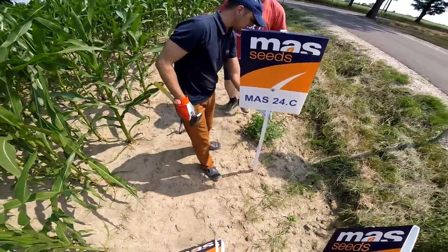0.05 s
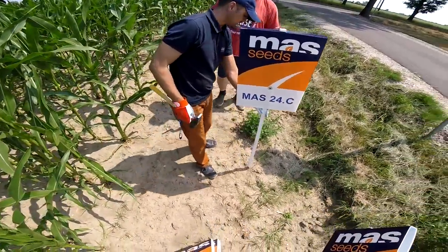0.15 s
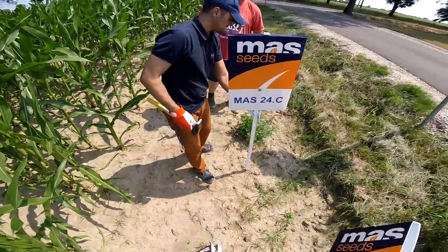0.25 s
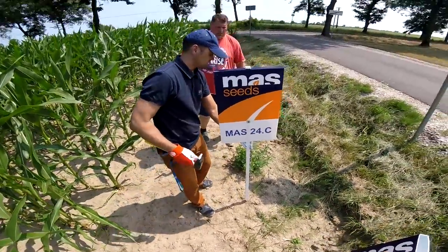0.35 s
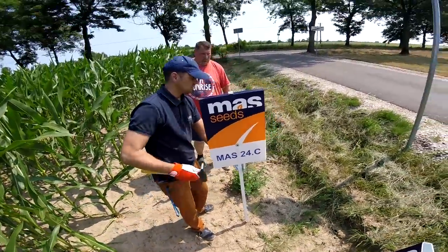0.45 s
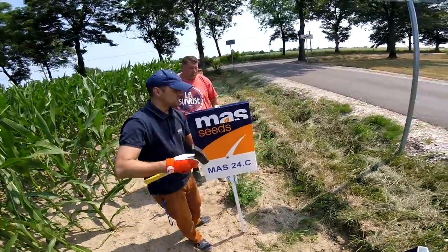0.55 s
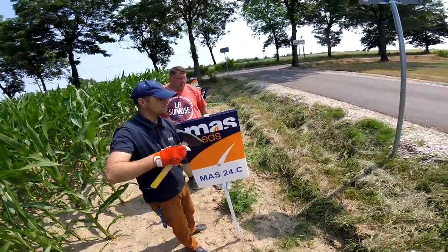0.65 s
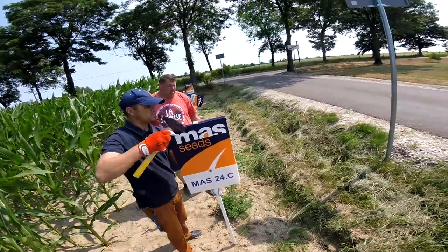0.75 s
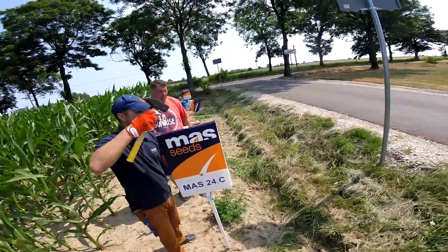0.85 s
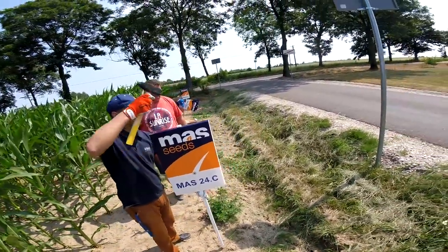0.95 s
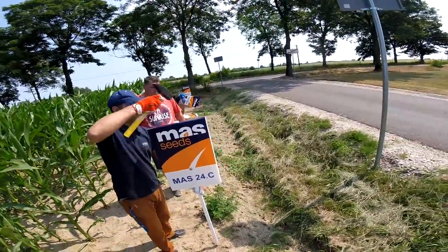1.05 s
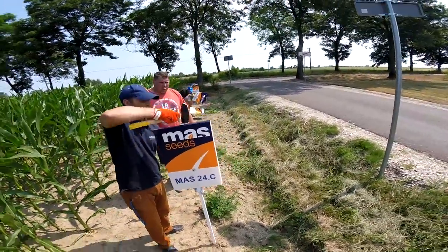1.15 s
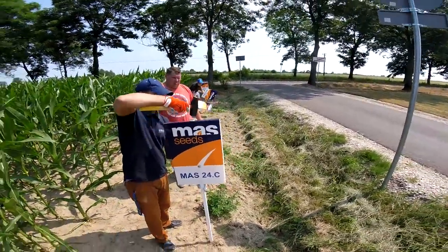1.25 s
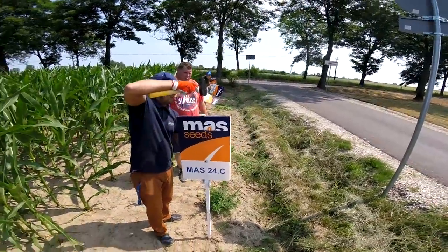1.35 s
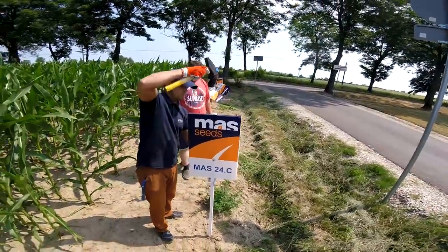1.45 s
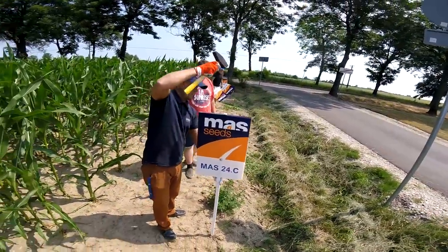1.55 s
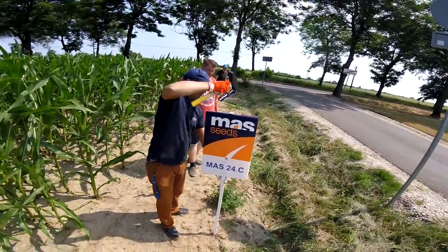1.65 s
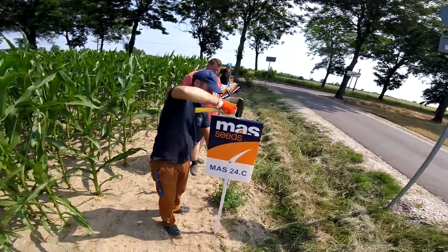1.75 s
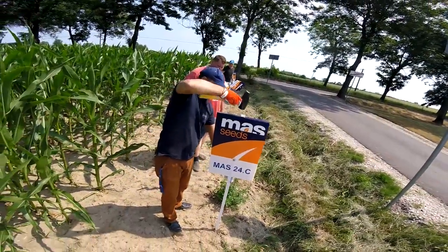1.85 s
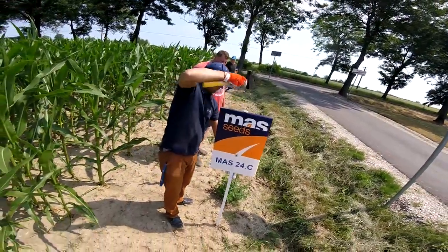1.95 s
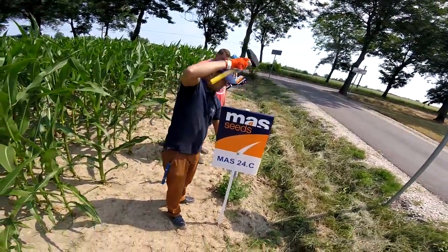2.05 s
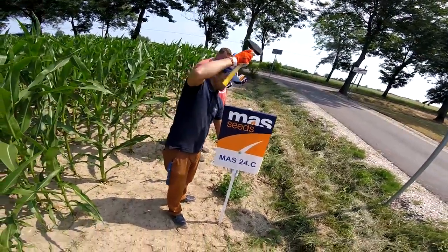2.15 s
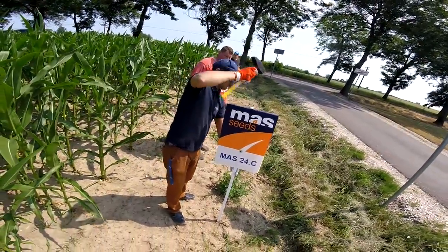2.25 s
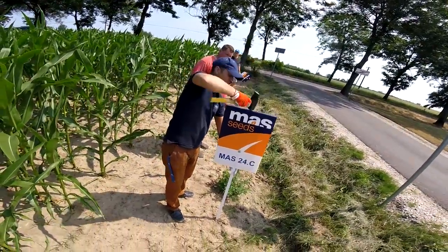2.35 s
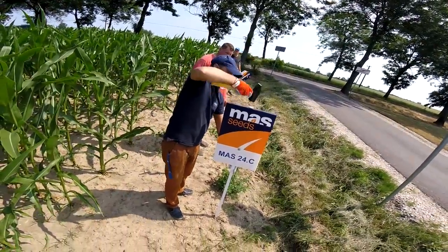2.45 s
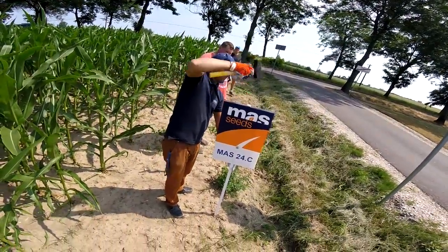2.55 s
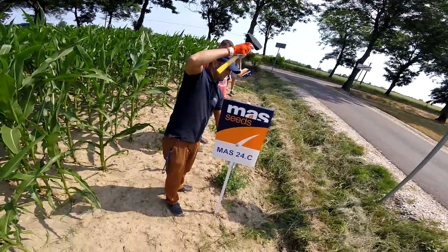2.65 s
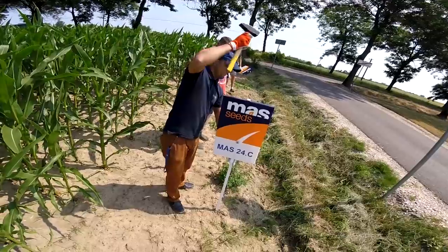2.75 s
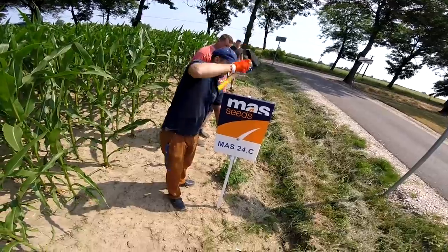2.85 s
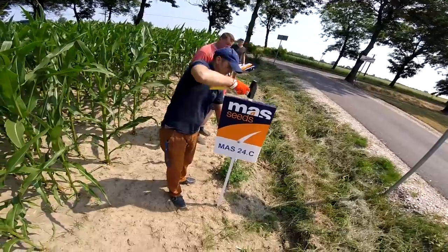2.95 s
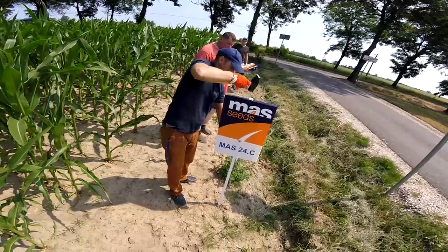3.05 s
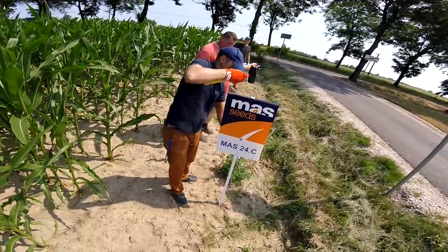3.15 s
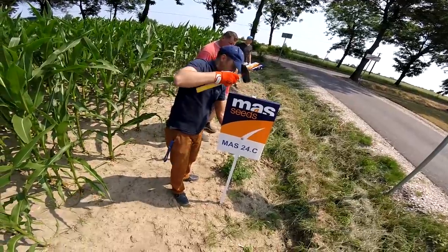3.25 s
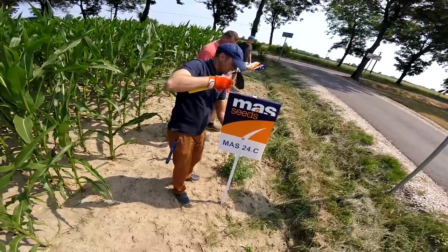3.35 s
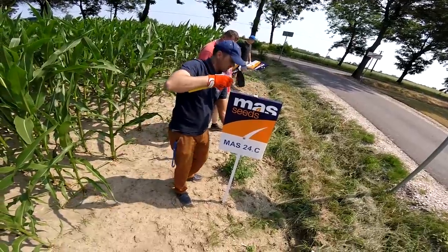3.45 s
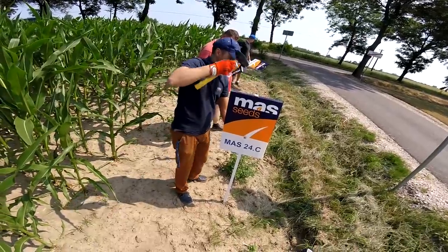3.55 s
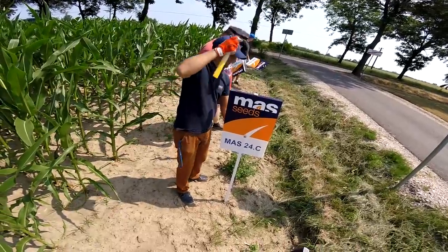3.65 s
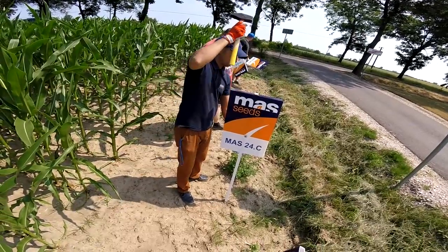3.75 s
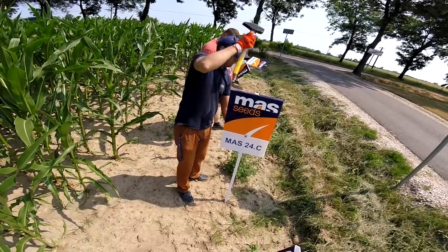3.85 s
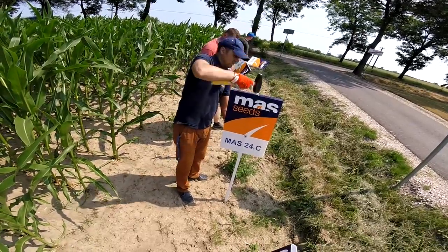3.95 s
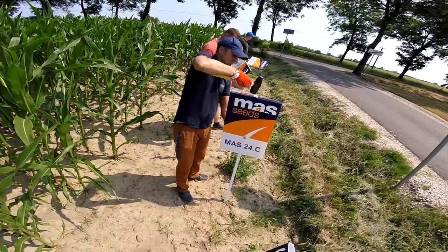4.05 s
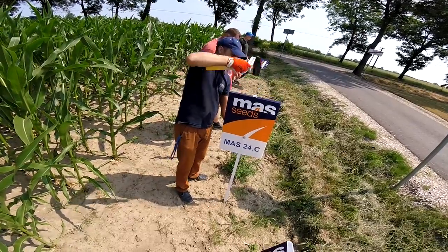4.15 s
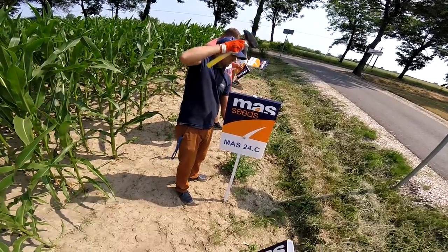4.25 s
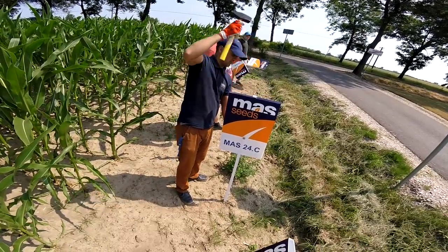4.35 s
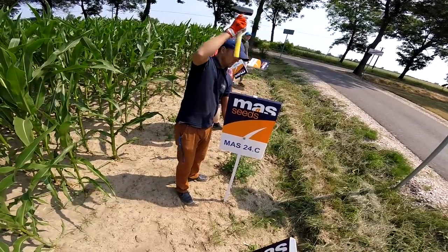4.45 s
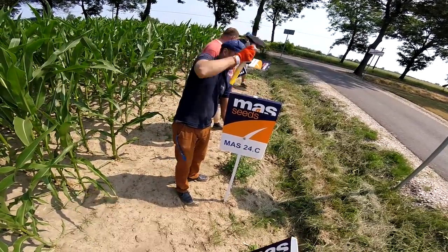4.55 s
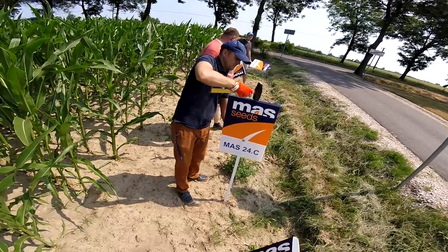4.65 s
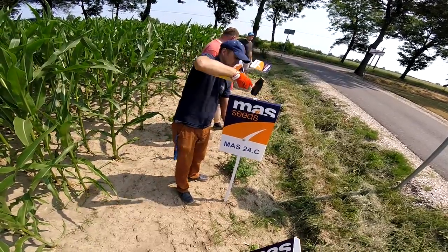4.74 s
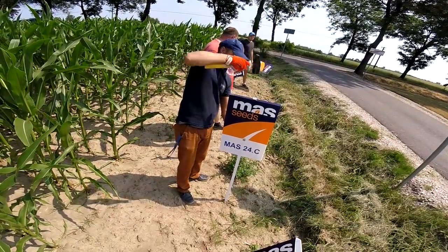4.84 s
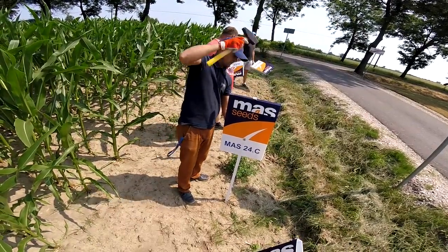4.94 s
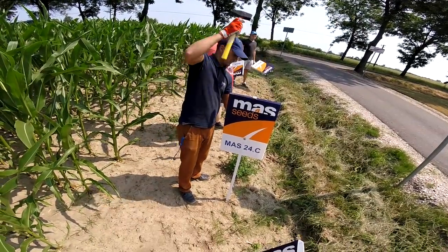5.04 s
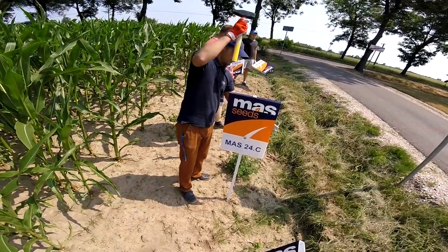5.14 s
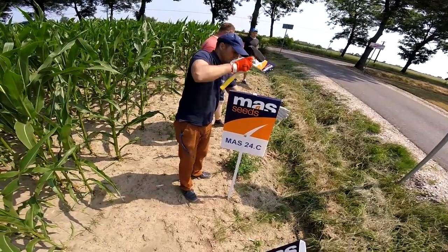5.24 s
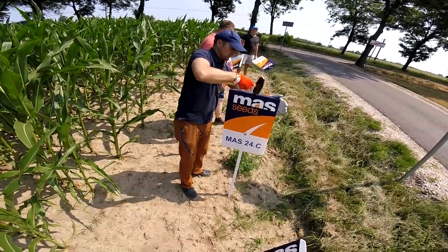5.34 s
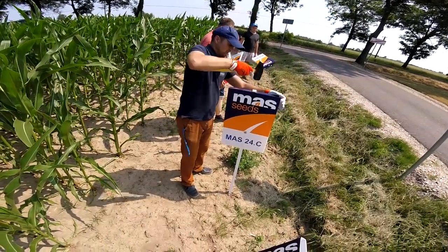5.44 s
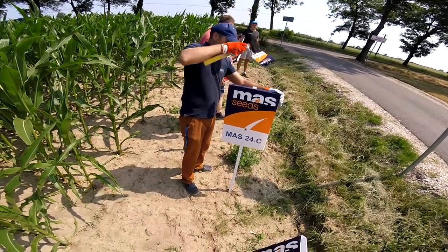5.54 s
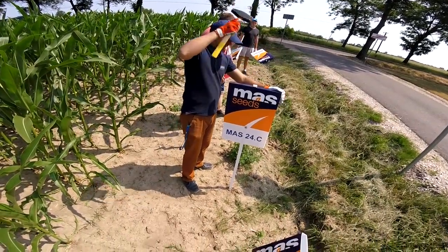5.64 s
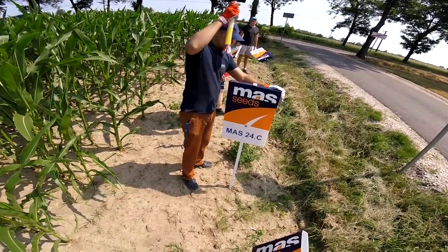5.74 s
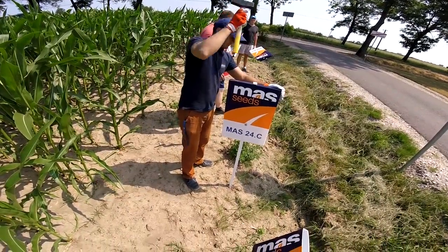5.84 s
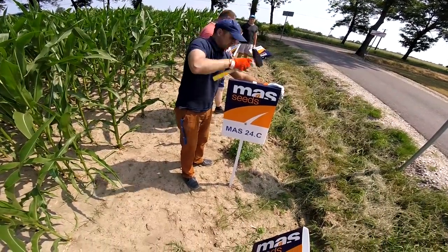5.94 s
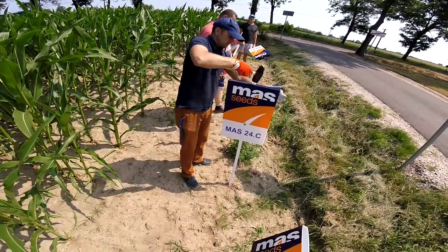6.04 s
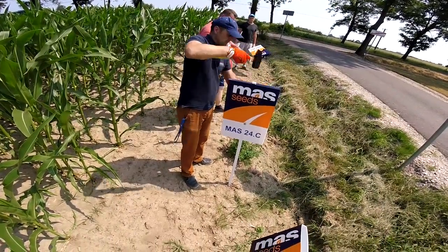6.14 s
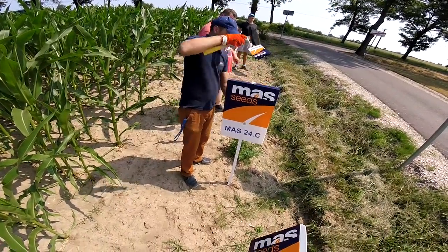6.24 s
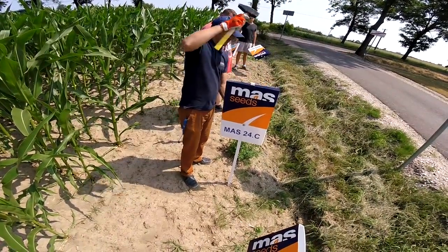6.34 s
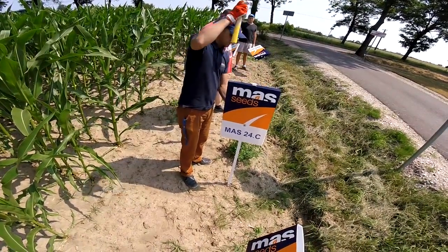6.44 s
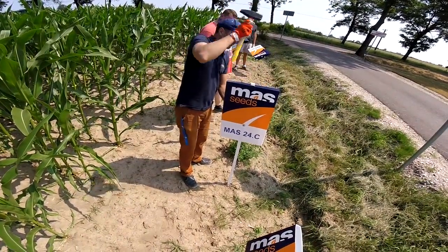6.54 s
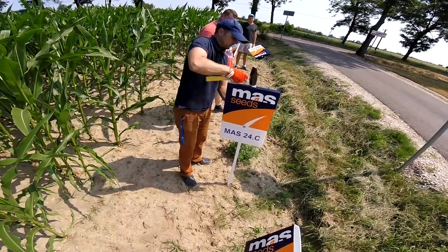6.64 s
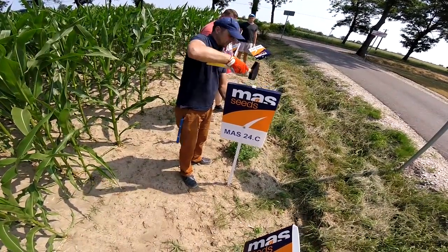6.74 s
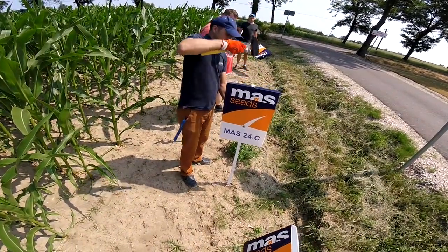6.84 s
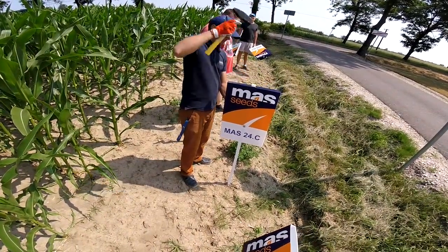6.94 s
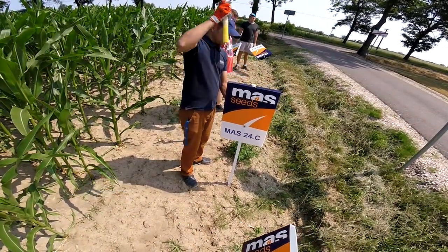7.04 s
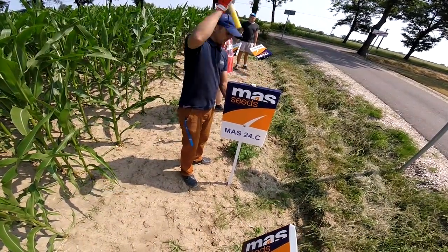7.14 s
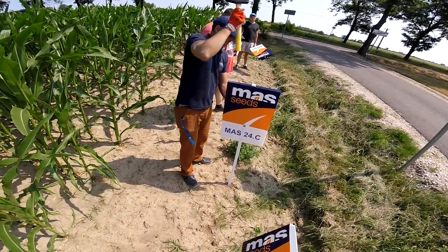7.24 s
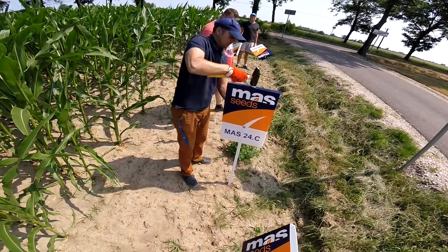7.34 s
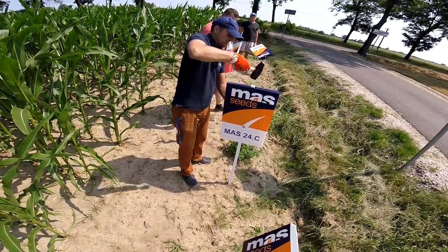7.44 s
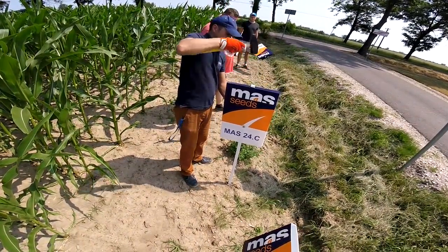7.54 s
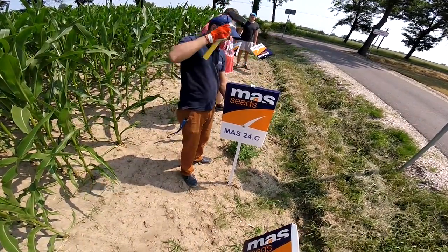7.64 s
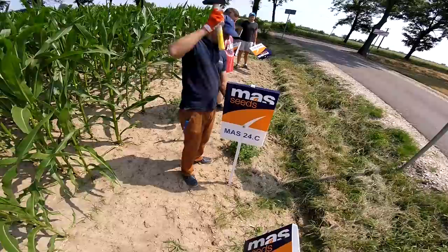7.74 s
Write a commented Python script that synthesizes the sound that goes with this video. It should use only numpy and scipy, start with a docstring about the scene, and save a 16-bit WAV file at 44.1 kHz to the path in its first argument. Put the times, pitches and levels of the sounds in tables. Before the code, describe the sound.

At the edge of a cornfield, a puff of wind rumbles on a small microphone and leaves rustle. Then a steel hammer hits a wooden stake ten times, about two thirds of a second apart, with one longer pause after the fourth. The stake thuds, its sign board clacks, and light echoes come back from the trees. The blows clip slightly and duck the quiet background of leaves, hiss, tiny scuffs and a thin whine.

```python
"""Wind buffets a small camera's microphone over hissing leaves, a thin whine and small gritty scuffs.
Then a steel hammer drives a wooden stake carrying a sign board into dry ground, ten blows.
The stake thuds and shudders, the loose board knocks and rattles, the hammer head sometimes rings.
Corn rows and roadside trees throw the blows back; the camera cuts their bass, ducks and clips."""
import sys
import numpy as np
from scipy import signal
from scipy.fft import rfft, irfft, next_fast_len
from scipy.io import wavfile
from scipy.ndimage import uniform_filter1d

SR = 44100
rng = np.random.default_rng(int(sys.argv[2]) if len(sys.argv) > 2 else 0)


def materialize(psi):
    """Save the field psi as 16-bit PCM at rate SR to the path in sys.argv[1].

    A 1-D psi becomes a single channel; in a 2-D psi each row is a channel.
    """
    bounded = np.clip(np.atleast_2d(psi).T, -1, 1)
    quanta = np.round(bounded * 32767).astype(np.int16)
    wavfile.write(sys.argv[1], SR, quanta)


N = 343539


def amp(db):
    """dB to gain."""
    return 10 ** (np.asarray(db) / 20)


def unit_rms(x):
    """Scales to rms 1."""
    return x / np.sqrt(np.mean(x ** 2) + 1e-20)


def at_hz(points, hz):
    """Reads a (freq_hz, value) table on a log-frequency axis."""
    freq_hz, value = np.transpose(points)
    return np.interp(np.log(hz + 1), np.log(freq_hz + 1), value)


def fader(rows, column=1):
    """One column of a time table at every sample."""
    rows = np.array(rows)
    return np.interp(np.arange(N) / SR, rows[:, 0], rows[:, column])


def add(mix, start_s, sound):
    """Drops a sound into the mix."""
    part = mix[round(start_s * SR):][:len(sound)]
    part += sound[:len(part)]


def eq(x, points):
    """Filters by a (freq_hz, gain_db) table, silent outside it."""
    hz = np.fft.rfftfreq(len(x), 1 / SR)
    inside = (hz >= points[0][0]) & (hz <= points[-1][0])
    return irfft(rfft(x) * amp(at_hz(points, hz)) * inside, len(x))


def noise(points, size=N):
    """Noise through an EQ curve, rms 1."""
    return unit_rms(eq(rng.standard_normal(size), points))


def jitter(t, per_s, knots=60):
    """Glides between random values, then holds the last."""
    return np.interp(t * per_s, np.arange(knots), rng.standard_normal(knots))


def drift(per_s):
    """Scene-long random movement, rms 1."""
    return unit_rms(jitter(np.arange(N) / SR, per_s, knots=800))


def ring(modes, t, spread_db):
    """Dying sines; each blow lands elsewhere, so level, pitch and phase vary."""
    luck = rng.standard_normal((len(modes), 3))
    return sum(amp(db + spread_db * level - 60 * t / t60)
               * np.sin(2 * np.pi * hz * (1 + .015 * detune) * t + hz / 2700 * phase)
               for (hz, db, t60), (level, detune, phase) in zip(modes, luck))


# Gust strength: time_s, rumble_db, flutter_db
GUST_LEVELS = [(0, -32, -35), (.26, -37.5, -44), (.43, -41.5, -53), (.59, -51.5, -57.5), (1.0, -54.5, -55),
               (1.28, -47.5, -46), (1.55, -40, -53.5), (1.9, -50, -46), (2.25, -56.5, -59),
               (2.5, -72, -59.5), (3.43, -75, -53.5), (3.9, -70.5, -58.5), (4.9, -82, -60.5),
               (6.4, -80.5, -60.5), (7.25, -78, -58.5), (7.45, -52, -62.5), (7.79, -75, -60)]
# Deep rumble and the flutter above it: freq_hz, gain_db
RUMBLE_EQ = [(12, -12.5), (30, -2), (60, -4.5), (100, -11.5), (130, -32)]
FLUTTER_EQ = [(110, -39), (140, 0.5), (200, -4), (280, -13.5), (380, -22.5)]
# Sudden puffs: start_s, level_db, pitch_hz, t60_s
PUFFS = [(.158, -9.5, 33.7, 0.2), (0.298, -26, 39.6, 0.11), (0.338, -35, 45., 0.14)]
def wind():
    """Lumpy air pressure on the microphone."""
    rumble = noise(RUMBLE_EQ) * amp(fader(GUST_LEVELS) + 3.5 * drift(12))
    flutter = noise(FLUTTER_EQ) * amp(fader(GUST_LEVELS, column=2) + 3.5 * drift(24))
    t = np.arange(8192) / SR
    for start_s, db, hz, t60 in PUFFS:
        overtone = .5 * np.sin(2 * np.pi * 3.54 * hz * t) * np.exp(-t / .096)
        swing = np.sin(2 * np.pi * hz * t) + overtone
        add(rumble, start_s, -amp(db - 60 * t / t60) * swing * np.clip(t / .0062, 0, 1))
    return rumble + flutter


# Swells of the rustle: time_s, level_db
LEAF_LEVELS = [(0, -46.5), (.3, -49), (.47, -51.5), (.6, -57), (.8, -50.5), (1.0, -58.5), (1.5, -56.5),
               (2.15, -53), (2.6, -60.5), (3.0, -46), (3.28, -60), (3.6, -49.5), (4.2, -57), (5.0, -60),
               (5.5, -55.5), (6.4, -61.5), (6.8, -59.5), (7.79, -58.5)]
# Its tone: freq_hz, gain_db
LEAF_EQ = [(150, -6), (250, 0), (363, -4), (403, -2.5), (555, -2), (705, -4.5), (1250, -5), (1960, -10.5),
           (2600, -10.5), (6000, -26.5), (7800, -58), (13200, -120)]
def leaves():
    """Leaves rustle in the breeze."""
    return noise(LEAF_EQ) * amp(fader(LEAF_LEVELS) + 1.2 * drift(22))


# Noise floor: time_s, level_db
HISS_LEVELS = [(0, -64.5), (1.5, -65), (3, -70), (3.9, -65.5), (5, -69), (6.5, -72.5), (7.2, -68),
               (7.79, -73.5)]
# Its tone: freq_hz, gain_db
HISS_EQ = [(2940, -43), (5000, -29), (5840, 2.5), (6660, 9), (8130, 8), (14700, -3), (15700, -6),
           (16000, -22.5)]
def hiss():
    """The microphone's own bright hiss."""
    return noise(HISS_EQ) * amp(fader(HISS_LEVELS))


# Faint background tone: time_s, level_db
WHINE_LEVELS = [(0, -65), (.6, -70), (1.5, -70), (2.4, -65), (3.5, -63.5), (4.5, -68), (5.2, -69),
                (5.6, -79), (7.79, -80)]
def whine(pitch_hz=2605):
    """One thin, slightly wavering tone."""
    cycles = np.cumsum(pitch_hz + 14 * drift(50)) / SR
    return amp(fader(WHINE_LEVELS) + 2.5 * drift(30)) * np.sin(2 * np.pi * cycles)


# Small scuffs and echo taps: start_s, level_db, centre_hz, length_s
SCUFFS_AND_TAPS = [(0.186, -43, 496, 0.015), (3.117, -47, 600, 0.015), (3.255, -48, 910, 0.022),
                   (3.358, -47, 565, 0.034), (3.493, -42.5, 1100, 0.036), (5.055, -49.5, 504, 0.012),
                   (7.391, -33, 925, 0.016)]
def grit_burst(level_db, hz, length_s):
    """A short gritty puff: a scuff on the soil, or the echo tap just after the last blow."""
    t = np.arange(4096) / SR
    grit = rng.standard_normal(len(t)) * amp(3 * rng.standard_normal(len(t)))
    grit = eq(grit, [(hz / 3, -16), (hz / 1.6, -2), (hz, 0), (hz * 1.6, -6), (hz * 3, -18), (7000, -32)])
    return amp(level_db) * unit_rms(grit) * np.clip(t / .003, 0, 1) * np.exp(-(t / length_s) ** 3)


# Stake resonances: pitch_hz, level_db, t60_s
STAKE_MODES = [(190.2, -6.5, 0.073), (280.5, -13, 0.043)]
def stake_thud(t, start_s, stake_hz, low_hz=166.1):
    """A push of air, then the stake swings, wobbling in the soil."""
    push = 1.6 * t / .0033 * np.exp(-t / .0026)
    swing_s = np.maximum(t - .0022, 0)  # once the head has sunk in
    low_db = -4 + .89 * start_s  # the low end grows as the soil grips
    modes = [(stake_hz, 0, .13), (low_hz, low_db, .15)] + STAKE_MODES
    wobble = amp(3.5 * np.clip(t / .03, 0, 1) * jitter(t, 70))
    return push - .81 * wobble * ring(modes, swing_s, spread_db=1.5) * (swing_s > 0)


# Low shake of stake and board: freq_hz, gain_db
SHUDDER_EQ = [(120, -25.5), (145, 0.5), (230, -2.5), (330, -16), (450, -27.5)]
def shudder(t, t60_s=.23):
    """Lumpy shaking in the loose soil that outlasts the thud."""
    shake = noise(SHUDDER_EQ, len(t))
    return shake * amp(-10.5 + 3 * jitter(t, 45) - 60 * t / t60_s) * np.clip(t / .012, 0, 1)


# Sign board resonances: pitch_hz, level_db, t60_s
BOARD_MODES = [(770, -5, .05), (950, -4, .05), (1040, -4, .055), (1135, -4, .045), (1320, -7, .04),
               (1520, -5, .04), (1620, -1.5, .04), (1790, -10, .035)]
def board_knock(t, knock_hz):
    """The board rings briefly, led by this blow's knock pitch."""
    knock = amp(-60 * t / .044) * np.sin(2 * np.pi * knock_hz * t)
    return -.9 * knock + .59 * ring(BOARD_MODES, t, spread_db=3.5)


# Hollow resonances: pitch_hz, level_db, t60_s
HOLLOW_MODES = [(350, -9.5, 0.052), (408, 4, 0.044), (463, 0, 0.053), (618.4, -1, .06)]
def hollow_body(t, start_s):
    """Stake and board move together, less so as the stake sinks in."""
    shake = noise([(150, -4), (400, 2.5), (900, -1.5), (1800, -3), (2400, -16.5)], len(t))
    body = ring(HOLLOW_MODES, t, spread_db=3) + amp(-8 - 60 * t / .13) * shake
    return amp(3.5 - 1.06 * start_s) * body


# Tone of the slap: freq_hz, gain_db
RATTLE_EQ = [(300, 3), (620, -8), (1100, -6.5), (1700, -21), (2400, -12), (3000, -16.5), (3800, -15.5),
             (4500, -20.5), (5300, -19), (6200, -34.5), (7500, -35.5), (11000, -44), (16000, -58.5)]
# Its decay: freq_hz, t60_s
RATTLE_DECAY = [(500, 0.031), (2000, 0.077), (6000, 0.08), (9000, .065), (14000, 0.045)]
def rattle(t, top_db):
    """The board slaps the stake: a noise burst whose upper mids last longest."""
    slap = eq(rng.standard_normal(len(t)), RATTLE_EQ)
    slap /= np.sqrt(np.mean(eq(slap, [(2000, 0), (8000, 0)]) ** 2))
    slap = eq(slap, [(100, .0038), (5500, .0082), (9000, top_db), (17000, top_db)])
    edges_hz = np.geomspace(300, 16000, num=9)
    bands = sum(eq(slap, [(lo, 0), (hi, 0)]) * amp(-60 * t / at_hz(RATTLE_DECAY, np.sqrt(lo * hi)))
                for lo, hi in zip(edges_hz, edges_hz[1:]))
    return bands * (amp(-10.5) + np.exp(-(t / .0028) ** 2))  # the first contact stands out


# Board edge resonances: pitch_hz, level_db, t60_s
EDGE_MODES = [(2360, -4, 0.031), (3214, -6.5, .02), (3777, -5, 0.023), (4304, -5, .02), (6193, -12, 0.035)]
def clack(t):
    """The board's hard edge rings high and short."""
    return ring(EDGE_MODES, t, spread_db=1.5)


# Hammer head resonances: pitch_hz, level_db, t60_s
STEEL_MODES = [(9950, 0, .5), (14050, -19, .6)]
def steel_ping(level_db):
    """The head rings until the grip damps it on the upswing."""
    t = np.arange(round(.3 * SR)) / SR
    head = sum(amp(db - 60 * t / t60) * np.sin(2 * np.pi * hz * t) for hz, db, t60 in STEEL_MODES)
    return amp(level_db) * head * np.clip((.28 - t) / .12, 0, 1)


# Tone of the reflections: freq_hz, gain_db
ECHO_EQ = [(100, -5), (200, 8), (450, -1), (950, 4), (1300, -2), (1650, 1.5), (2300, -11), (3700, -6.5),
           (5200, -18), (6300, -20), (8000, -29), (10000, -33.5)]
def reflections(t, knock_hz, crack_db):
    """Stalks and leaves return a dense wash of taps, some with the knock's pitch."""
    taps, knock_taps = rng.standard_normal((2, len(t))) * (rng.random((2, len(t))) < .3)
    knock = np.exp(-t[:600] / .0011) * np.sin(2 * np.pi * knock_hz * t[:600])
    pitched = unit_rms(signal.fftconvolve(knock_taps, knock)[:len(t)])
    wash = unit_rms(eq(taps, ECHO_EQ)) + .34 * pitched
    treble_db = -2.5 + .6 * crack_db  # a sharper crack comes back brighter
    return eq(wash, [(50, .014), (1800, .0015), (3200, treble_db), (17000, treble_db)])


# Echo tail from corn and trees: delay_s, level_db
TAIL_LEVELS = [(0.018, -9), (0.058, -38), (.1, -34), (.16, -43.5), (0.219, -56), (.27, -56.5), (.31, -52),
               (.35, -65), (0.602, -65.5)]
def corn_echo(t, start_s, wash):
    """The wash dies away in lumps, because the trunks stand apart."""
    delay_s, level_db = np.transpose(TAIL_LEVELS)
    distance_db = -.5551 * start_s  # the camera steps away from the corn
    gate = np.clip((t - delay_s[0]) / .004, 0, 1) * (t < delay_s[-1])
    return wash * amp(distance_db + np.interp(t, delay_s, level_db) + 1.5 * jitter(t, 130)) * gate


def trunk_echo(t, start_s, pitch_hz=950, taps_per_s=260, delay_s=.15, spread_s=.07):
    """The row of trees answers with a cluster of short hollow notes."""
    taps = rng.standard_normal(len(t)) * (rng.random(len(t)) < taps_per_s / SR)
    rise = t[:2000] / .0022
    note = rise * np.exp(-rise) * np.sin(2 * np.pi * pitch_hz * t[:2000])
    notes = unit_rms(signal.fftconvolve(taps, note)[:len(t)])
    swell = np.exp(-((t - delay_s) / spread_s) ** 2) * np.clip(t / .03, 0, 1)
    return amp(-59 + 2 * start_s) * notes * swell  # louder as the camera faces the trees


# Slapback strength as the camera turns: time_s, level_db
SLAPBACK_LEVELS = [(1.1, -42.5), (2.9, -52.5), (5.2, -53), (7.4, -47)]
def slapback(t, start_s, knock_hz, wash, pitch_hz=1430):
    """One hard surface across the road returns a dull tock."""
    delay_s = .3085 - .0009 * start_s  # shortens as the camera moves
    level_db = np.interp(start_s, *np.transpose(SLAPBACK_LEVELS))
    rise = np.maximum(t - delay_s, 0) / .0058
    tock = np.sin(2 * np.pi * pitch_hz * t) + .21 * np.sin(2 * np.pi * knock_hz * t) + .3 * wash
    return amp(level_db) * rise * np.exp(1 - rise) * tock


# Hammer blows, levels as layer trims (top_db is the rattle's treble shelf):
# start_s, thud_db, knock_db, crack_db, top_db, stake_hz, knock_hz, steel_db
HAMMER_BLOWS = [(1.106, 4, 11.5, -6.5, 3, 247.6, 1002, -75), (1.689, 5, 10.5, -0.2, -0.5, 251, 707, -60),
                (2.308, 4.5, 13, 5, -18, 240, 728, -53), (2.889, 4.5, 11.5, 4, -5, 259.7, 794, -58),
                (3.947, -2.5, 8, 6, 7, 251, 1753, -39.5), (4.61, 4, 11, 7, -3.5, 203, 1063, -78.5),
                (5.271, 1, 10.5, 7, 0.5, 217, 1107, -84), (5.948, 0, 10, 4, 11.5, 203, 1019, -79),
                (6.616, -0.9, 10.5, 0.4, 1.5, 219, 1018, -72),
                (7.328, 2.5, 10.5, 1.6, 2, 214.3, 920, -47.5)]
def hammering():
    """Each blow sets off stake, board and steel; the echoes follow."""
    track = np.zeros(N)
    t = np.arange(round(.65 * SR)) / SR
    contact = np.sin(np.pi / 2 * np.clip((t - .0008) / .001, 0, 1)) ** 2  # the fibres give first
    for start_s, thud_db, knock_db, crack_db, top_db, stake_hz, knock_hz, steel_db in HAMMER_BLOWS:
        thud = amp(thud_db) * (stake_thud(t, start_s, stake_hz) + shudder(t))
        chatter = 1 + .55 * np.clip(t / .006, 0, 1) * jitter(t, 500, knots=400)  # the board is loose
        knock = amp(knock_db) * chatter * board_knock(t, knock_hz)
        hollow = amp(thud_db) * hollow_body(t, start_s)
        crack = amp(crack_db) * (rattle(t, top_db) + chatter * clack(t))
        wash = reflections(t, knock_hz, crack_db)
        echoes = corn_echo(t, start_s, wash) + trunk_echo(t, start_s)
        echoes += slapback(t, start_s, knock_hz, wash)
        add(track, start_s, thud + contact * (knock - hollow + crack) + echoes)
        add(track, start_s + .001, steel_ping(steel_db))
    return track


def low_cut(x, corner_hz=135):
    """The camera's steep zero-phase bass cut; it rings at its corner."""
    size = next_fast_len(N + SR)
    hz = np.fft.rfftfreq(size, 1 / SR)
    gain = amp(-31) + 1 / (1 + (corner_hz / (hz + 1)) ** 22)
    return irfft(rfft(x, size) * gain, size)[:N]


def scene():
    """Mono mix: bass-cut blows over scuffs and taps, leaves, hiss, whine and wind."""
    blows = low_cut(hammering())
    grit = np.zeros(N)
    for start_s, *shape in SCUFFS_AND_TAPS:
        add(grit, start_s, grit_burst(*shape))
    return (blows + grit + leaves() + hiss() + whine() + wind())[None]


def overshoot(power_db, threshold_db, release_db_per_s):
    """Level above a threshold, with instant attack and a limited release rate."""
    fall = np.arange(N) * release_db_per_s / SR
    return np.maximum(np.maximum.accumulate(power_db + fall) - fall - threshold_db, 0)


def record(dry):
    """The camera ducks at each blow, recovers fast then slowly, clips peaks and cuts above 16.2 kHz."""
    sidechain = signal.lfilter(*signal.butter(2, 200, "high", fs=SR), dry[0])  # deaf to wind rumble
    power_db = 10 * np.log10(abs(uniform_filter1d(sidechain ** 2, 200, origin=60)) + 1e-12)
    quick_db = .33 * overshoot(power_db, threshold_db=-38, release_db_per_s=260)
    slow_db = .022 * overshoot(power_db, threshold_db=-4, release_db_per_s=6.7)
    ducked = dry / amp(uniform_filter1d(quick_db + slow_db, 60))
    clipped = ducked / (1 + abs(ducked / .99) ** 6) ** (1 / 6)
    high_cut = signal.firwin(255, 16200, window=("kaiser", 9), fs=SR)
    return signal.oaconvolve(clipped, high_cut[None], "same")


dry = scene()
out = record(dry)
materialize(out)
```